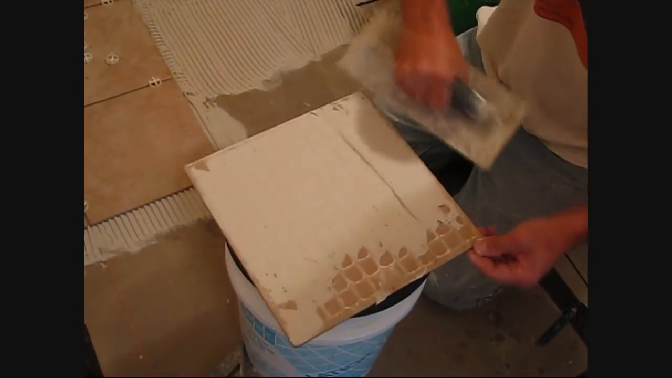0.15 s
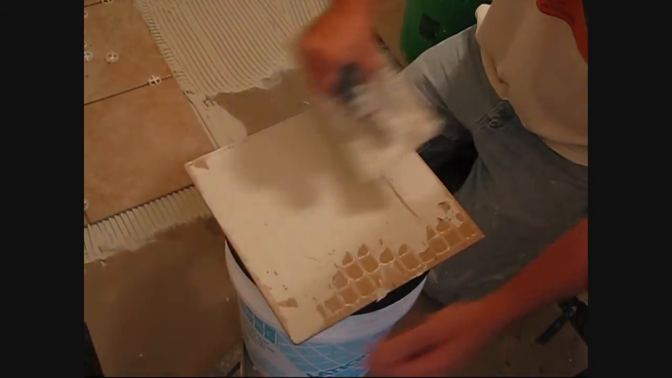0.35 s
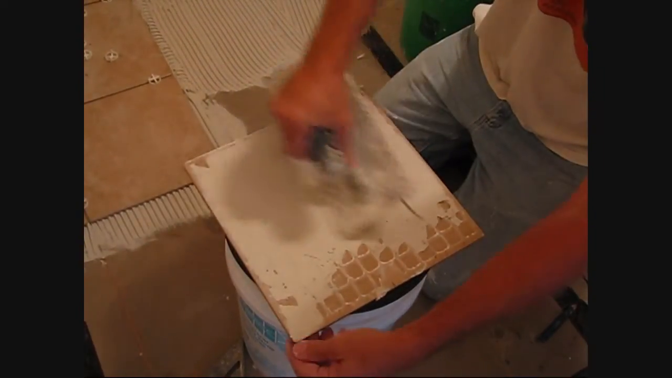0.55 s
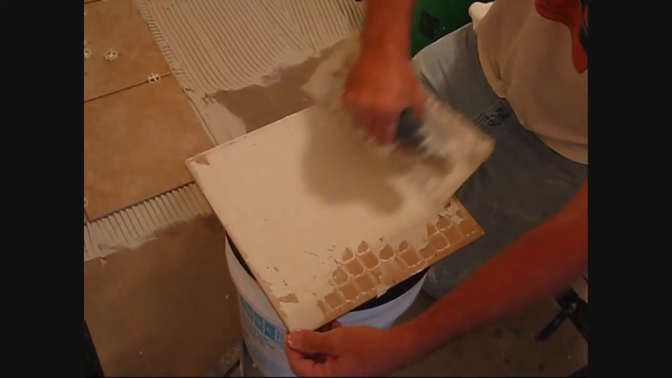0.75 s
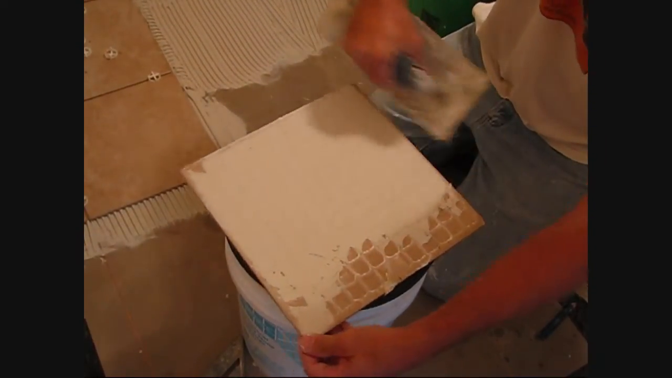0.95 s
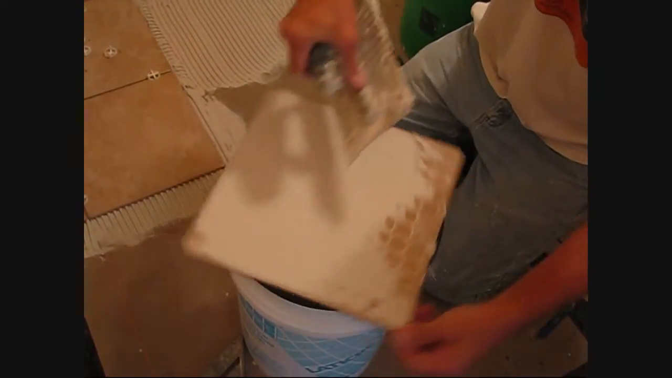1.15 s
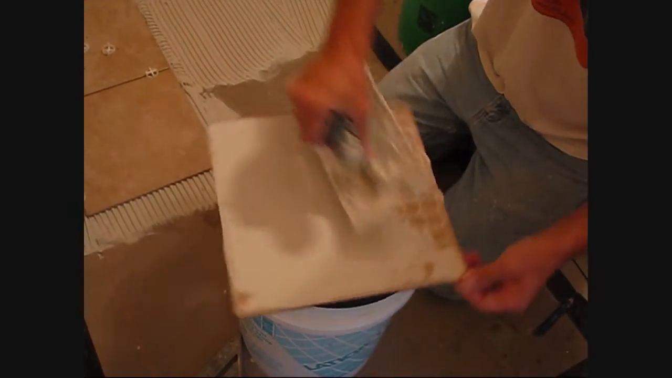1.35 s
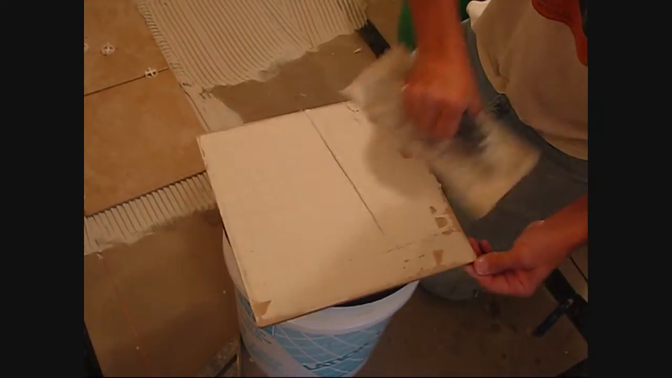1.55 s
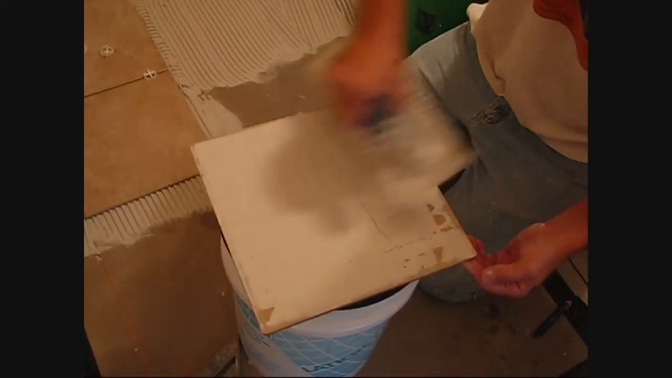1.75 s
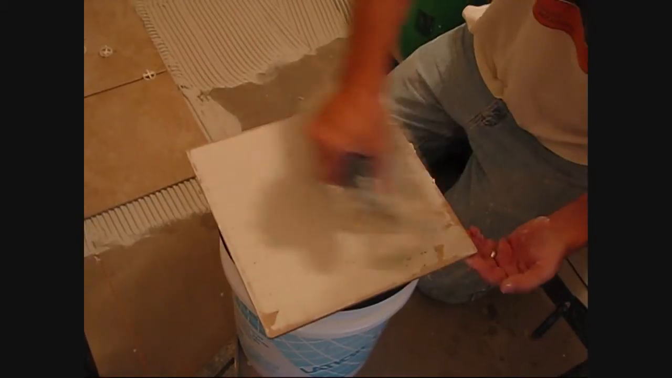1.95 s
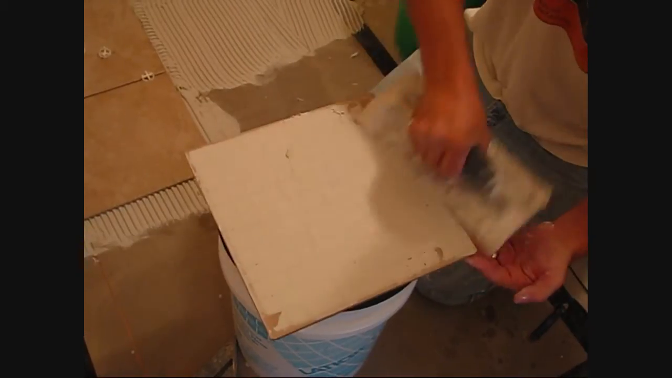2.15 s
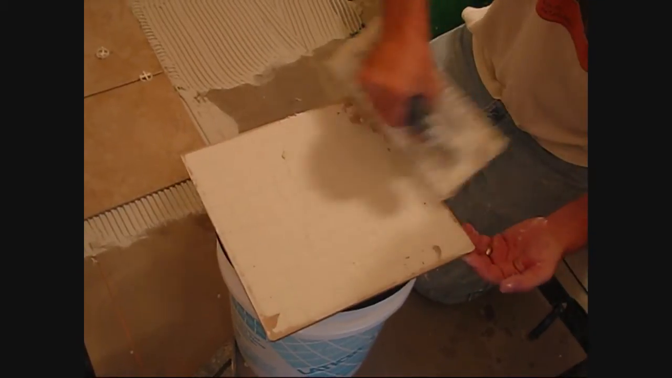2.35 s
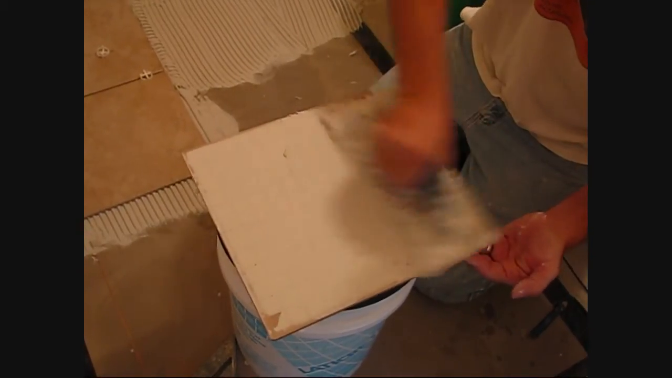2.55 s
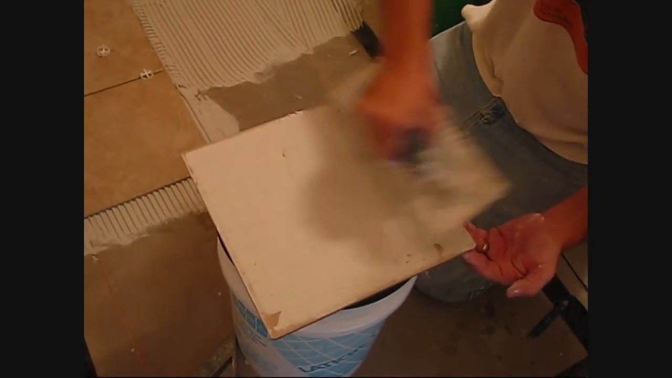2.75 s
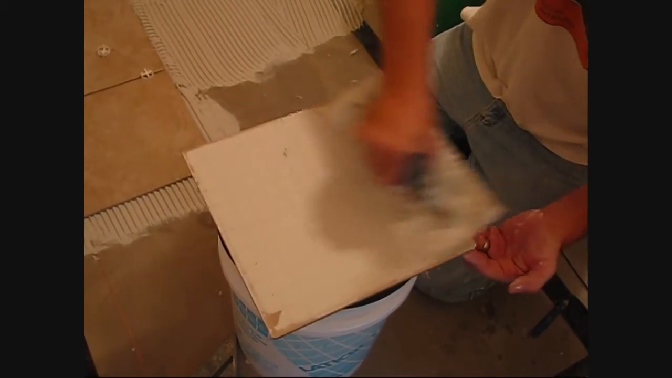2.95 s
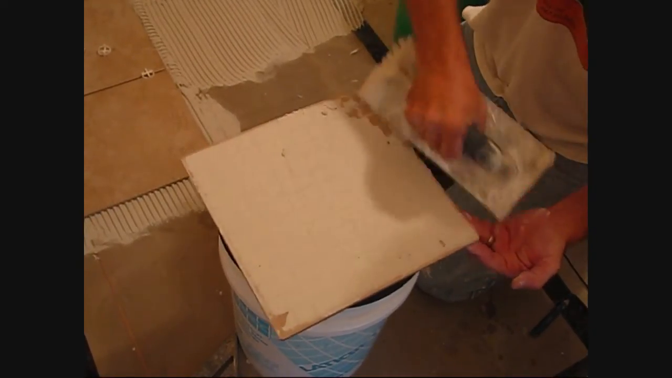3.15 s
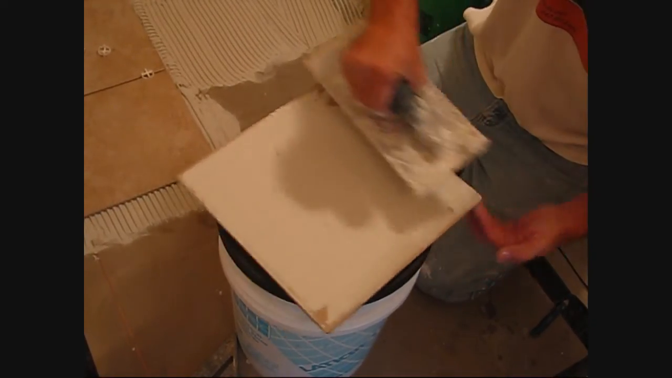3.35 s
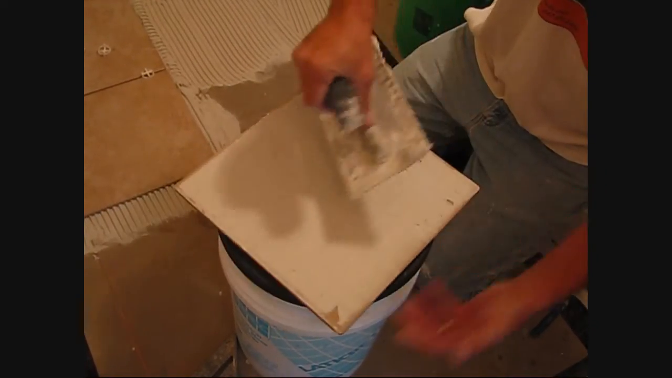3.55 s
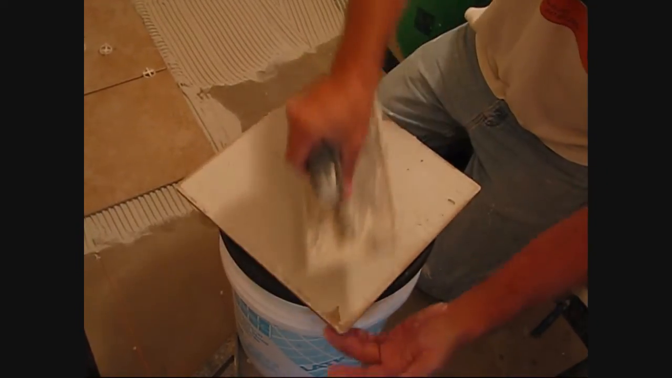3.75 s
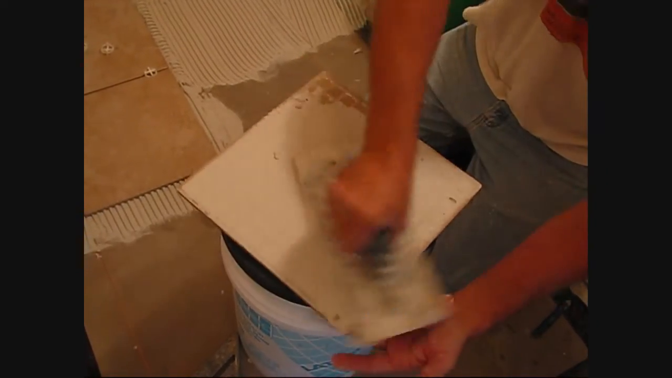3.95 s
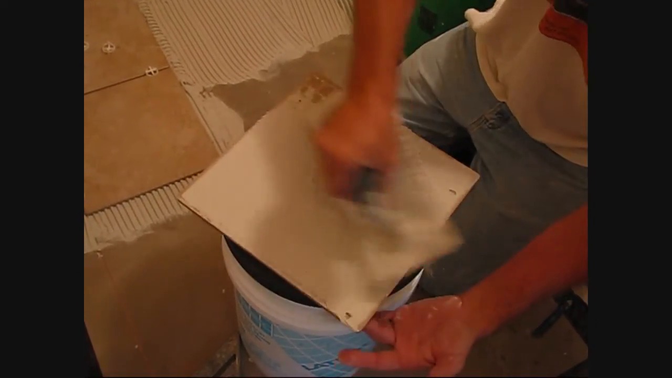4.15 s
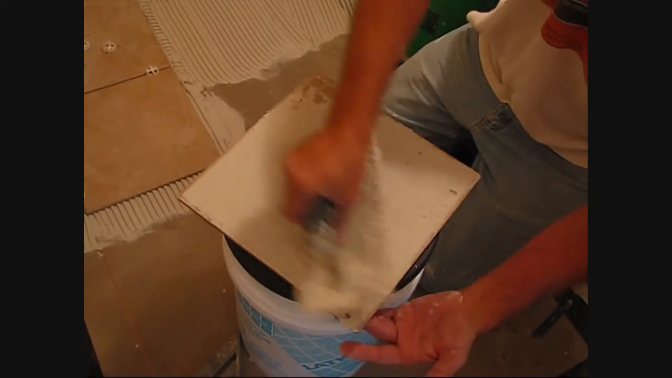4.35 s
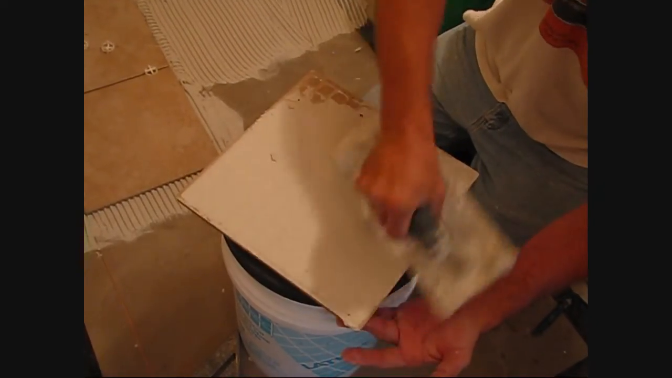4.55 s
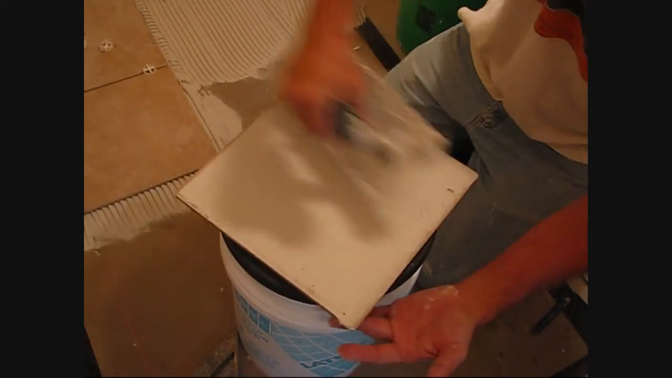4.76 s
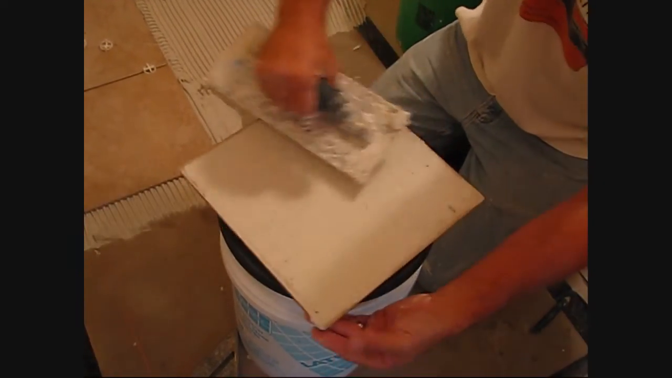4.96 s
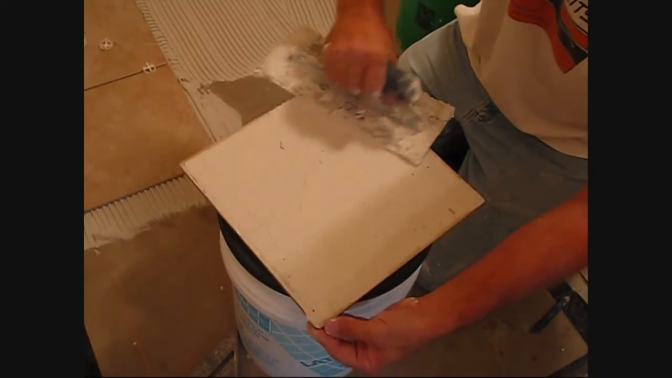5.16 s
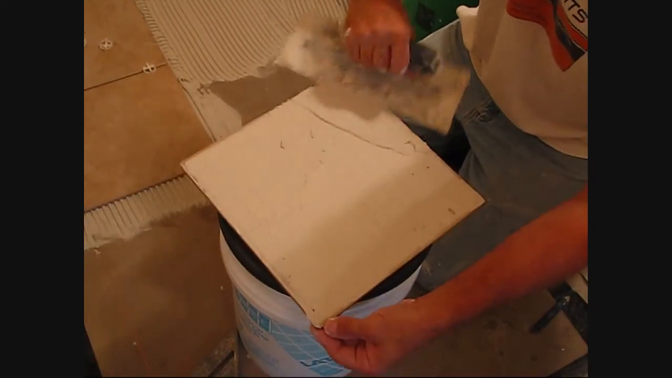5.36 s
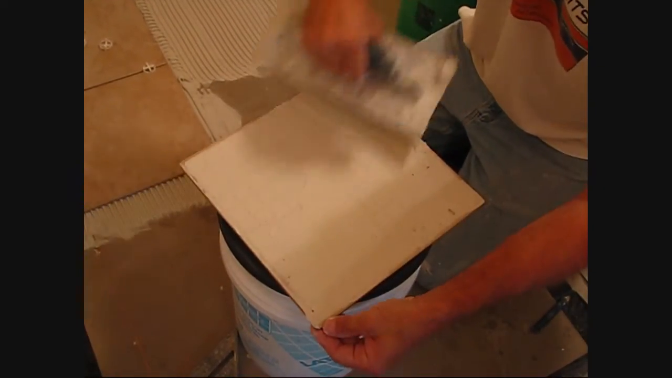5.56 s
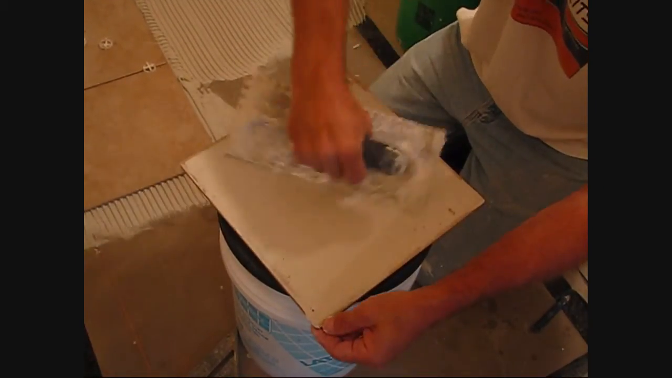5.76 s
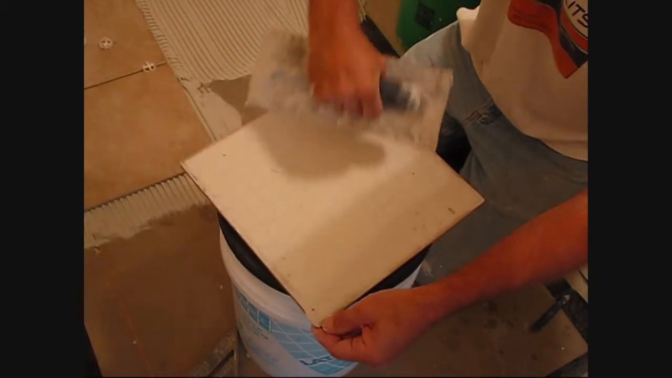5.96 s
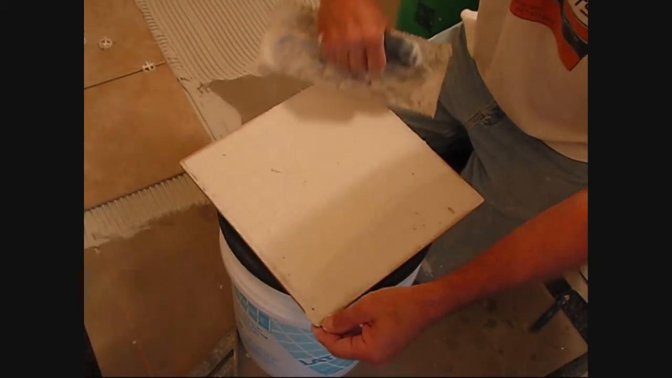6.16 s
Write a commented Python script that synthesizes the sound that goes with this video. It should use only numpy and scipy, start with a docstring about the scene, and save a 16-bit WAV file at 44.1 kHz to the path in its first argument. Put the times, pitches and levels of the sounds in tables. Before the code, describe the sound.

Sandy scrapes of a trowel spreading mortar on a tile, mixed with sharp ticks and soft thumps from the plastic bucket underneath.

```python
"""A steel trowel spreads and scrapes mortar over the back of a tile that lies on a plastic bucket.
Sand grains crushed under the blade ring the tile and hiss at the steel edge; each landing thumps the
bucket. Between strokes the tile is turned on the rim. The place is a bare room, heard through the
stereo microphone of a small camera about a metre above the work."""
import sys
import numpy as np
from scipy import signal
from scipy.fft import rfft, irfft, next_fast_len
from scipy.io import wavfile
from scipy.ndimage import uniform_filter1d

SR = 44100
rng = np.random.default_rng(int(sys.argv[2]) if len(sys.argv) > 2 else 0)


def generate_wav(signal):
    """Clip the signal to [-1, 1] and save it as 16-bit WAV at the path in sys.argv[1]."""
    frames = np.transpose(np.atleast_2d(signal))
    scaled = np.clip(frames, -1, 1) * 32767
    pcm = np.round(scaled).astype(np.int16)
    wavfile.write(sys.argv[1], SR, pcm)


N = 277375
TIME = np.arange(N) / SR
BITE_S, LIFT_S = 0.005, 0.026  # the blade bites into the mortar, leaves the tile
HISS_HOLD_S, RASP_HOLD_S = 0.0087, 0.032  # the edge comes free first, the mortar drags a little longer

# diffuse sound at the microphone's two ports: (frequency [Hz], side minus mid [dB])
STEREO_WIDTH = [(60, -25), (130, -25.5), (250, -17.5), (500, -10.5), (1000, -11), (2000, -3.5), (4000, 0.5),
                (8000, 1), (14000, 2)]
# the tile is pushed onto the bucket, and at 4.410 s the blade digs into the mortar: (time [s], thump [dB],
# thump tilt [dB/octave], rocking time [s], gritty clack [dB])
PUSHES = [(0.023, -20, 7.5, 0.027, -22.5), (0.597, -28, 1, 0.035, -25), (1.464, -30, -3, 0.07, -30),
          (1.906, -27.5, 5, 0.021, -37), (2.599, -32.5, 9, 0.04, -20), (2.945, -29, 3, 0.017, -25),
          (3.391, -32, 3, 0.068, -33.5), (3.969, -20, 0.5, 0.027, -22.5), (4.340, -41, -3, .05, -30),
          (4.410, -53, -1, .02, -13.5), (4.793, -40, -10.5, .04, -56.5), (5.153, -44, -5, 0.043, -54.5),
          (5.326, -47, 2, .03, -47), (5.835, -32, 6.5, 0.036, -13.5)]
# rasp of sand on the tile: (frequency [Hz], relative level [dB])
RASP_SPECTRUM = [(40, -30), (130, -29), (250, -18), (400, -9), (600, -6), (850, -0.5), (1150, 0),
                 (1600, 0.5), (2600, -1.5), (3400, -8), (5000, -10), (8000, -21), (16000, -23.5)]
# hiss of the steel edge: (frequency [Hz], relative level [dB])
EDGE_SPECTRUM = [(300, -12), (900, -10), (2000, -5.5), (2850, 1), (3500, -1.5), (5000, 0), (6300, -3.5),
                 (7300, -0.5), (9000, -4), (12000, -4), (16000, -10.5)]
# the blade lands, is pressed down, eases as the arm draws back and runs off the tile's edge:
# (time [s], pressed after [s], runs off after [s], landing [dB], pressed rasp [dB], easing [dB/s],
#  edge hiss [dB], run-off rasp [dB], run-off hiss [dB], run-off swell [s],
#  low ring [Hz], its level [dB], high ring [Hz], its level [dB], rasp tilt [dB/octave])
LONG_STROKES = [ (0.59, 0.037, 0.29, -14.5, -15, 50, -28, -18, -20, 0.032, 918, -4, 1340, -2.5, 1),
                (1.905, .042, 0.34, -20.5, -12, 83, -27.5, -23.5, -23.5, 0.037, 720, 5, 1550, -2, 1),
                (2.92, 0.029, 0.24, -23, -14, 78, -26.5, -22, -24, 0.037, 745, -1.5, 1737, -13, 1),
                (4.34, 0.04, 0.22, -31.5, -17, 31.5, -23, -23, -24.5, 0.045, 1008, 8, 1770, -6.5, 1.5),
                (5.828, 0.067, .41, -17.5, -13.5, 62, -27, -25, -19, 0.11, 1012, 5, 2085, -1, .5), ]


def undb(db):
    """Decibels to gain."""
    return 10 ** (np.asarray(db) / 20)


def unit(x):
    """Scale to rms 1."""
    return x / np.sqrt(np.mean(x ** 2))


def at(points, hz):
    """Read a table of (frequency [Hz], value) on a log-frequency axis."""
    frequencies, values = np.transpose(points)
    return np.interp(np.log(hz + 1), np.log(frequencies), values)


def colour(x, spectrum, size=4096):
    """Pass x through a minimum-phase filter of unit energy with the given spectrum."""
    gains = undb(at(spectrum, np.arange(size // 2 + 1) * SR / size))
    cepstrum = irfft(np.log(gains))
    cepstrum[1:size // 2] *= 2
    cepstrum[size // 2 + 1:] = 0
    response = irfft(np.exp(rfft(cepstrum)))
    return signal.fftconvolve(x, response / np.linalg.norm(response))[:len(x)]


def weigh(x, points):
    """Equalise x by a table of (frequency [Hz], gain [dB])."""
    size = next_fast_len(len(x) + 4096)
    gains = undb(at(points, np.arange(size // 2 + 1) * SR / size))
    return irfft(rfft(x, size) * gains, size)[:len(x)]


def resonate(x, hz, width_hz):
    """One resonance, gain 1 at its centre."""
    return signal.lfilter(*signal.iirpeak(hz, hz / width_hz, fs=SR), x)


def drift(rate_hz):
    """Smooth random drift of rms 1."""
    step = max(int(SR / rate_hz), 2)
    stairs = np.repeat(rng.standard_normal(N // step + 1), step)[:N]
    return unit(uniform_filter1d(stairs, step))


def add(track, start_s, sound):
    """Mix a sound into a track at start_s."""
    i = max(int(start_s * SR), 0)
    track[i:i + len(sound)] += sound[:N - i]


def gate(t, rise_s, length_s, fade_s):
    """Rise from t = 0, hold until length_s, then fade."""
    return np.clip(t / rise_s, 0, 1) * np.exp(-np.maximum(t - length_s, 0) / fade_s)


def room_tone(level_db=-60, whine_hz=8000, whine_db=-80.5):
    """The quiet room's low rumble, the camera's hiss and a thin electrical whine."""
    # rumble and hiss: (frequency [Hz], relative level [dB])
    spectrum = [(25, 4.5), (65, -1), (100, -18), (140, -4), (250, -15), (600, -20), (1500, -22),
                (4000, -28.5), (16000, -37)]
    mid, side = (colour(rng.standard_normal(N), spectrum) for _ in range(2))
    side = weigh(side, STEREO_WIDTH)
    whine = unit(resonate(rng.standard_normal(N), whine_hz, width_hz=120))
    return undb(level_db) * np.array([mid + side, mid - side]) + undb(whine_db) * whine


def wall_responses(count, early_db=2, early_s=0.011, gap_s=0.0032):
    """Bare walls return strong first reflections, then a tail in which the treble dies first."""
    # the room's reverberation: (frequency [Hz], t60 [s])
    decay_times = [(100, 0.69), (250, 0.56), (550, 0.72), (1400, 0.71), (3000, 0.58), (5500, 0.53),
                   (9500, 0.44), (15000, 0.35)]
    hz, frame_s, noise = signal.stft(rng.standard_normal((count, SR)), SR, nperseg=256)
    decay = np.exp(-np.log(1000) * frame_s / at(decay_times, hz)[:, None])
    tails = signal.istft(noise * decay, SR)[1][:, :SR]
    t = TIME[:SR]
    arrival = np.clip(t / gap_s - 1, 0, 1)
    responses = tails * arrival * (1 + undb(early_db) * np.exp(-t / early_s))
    return responses / np.linalg.norm(responses, axis=1, keepdims=True)


def bare_room(x, direct_db=-4, wet_db=-4, scatter_hz=220, places=4):
    """Grains break at scattered places along the blade; each reaches the mic with its own echoes."""
    # direct sound from the blade at the microphone: (frequency [Hz], left minus right [dB])
    balance = [(250, 2.5), (600, -2.5), (2000, -3.5), (4000, 3.5), (12000, 1.5)]
    shares = np.array([drift(scatter_hz) for _ in range(places)])
    shares /= np.linalg.norm(shares, axis=0)
    size = next_fast_len(N + SR)
    sent = rfft(shares * x * undb(wet_db), size)
    echo_spectra = [np.sum(sent * rfft(wall_responses(places), size), axis=0) for _ in range(2)]
    mid, side = irfft(echo_spectra, size)[:, :N]
    side = weigh(side, STEREO_WIDTH)
    direct = [weigh(x, [(hz, sign * db / 2) for hz, db in balance]) for sign in (1, -1)]
    return undb(direct_db) * np.array(direct) + np.array([mid + side, mid - side])


def sand(per_s, spread_db):
    """Clicks of crushed grains: many small, a few large."""
    hits = rng.random(N) < per_s / SR
    sizes = undb(spread_db * np.minimum(rng.exponential(size=N), 5))
    return unit(hits * sizes * np.sign(rng.standard_normal(N)))


def rubbing(groan_hz=222, groan_width_hz=35):
    """A scrape fades; later the turned tile stutters over the gritty rim and the bucket's wall groans."""
    # a fading scrape at the start, then nudges of the tile: (time [s], length [s], rub [dB], groan [dB])
    rubs = [(0.01, 0.093, -35, -58), (1.082, 0.26, -48, -57.5), (2.03, 0.22, -62, -56.5),
            (2.7, 0.16, -45.5, -47), (3.377, 0.066, -48, -51.5), (5.204, 0.19, -62, -76.5),
            (5.93, .36, -52, -48)]
    # the rubbed rim: (frequency [Hz], relative level [dB])
    rim_spectrum = [(30, -14.5), (100, -2), (160, 4), (240, -8), (330, -4), (700, -5.5), (1500, -7),
                    (3000, -17), (8000, -20), (16000, -30)]
    rub, strain = np.zeros(N), np.zeros(N)
    for start_s, length_s, rub_db, groan_db in rubs:
        push = gate(TIME - start_s, rise_s=0.043, length_s=length_s, fade_s=0.09)
        rub += undb(rub_db) * push
        strain += undb(groan_db) * push
    slips = sand(per_s=2800, spread_db=1) * undb(2 * drift(rate_hz=30))
    groan = unit(resonate(resonate(slips, groan_hz, groan_width_hz), groan_hz, groan_width_hz))
    return colour(slips * rub, rim_spectrum) + groan * strain


def bucket_thumps(swell_s=0.02, boom_db=-1, flap_db=-6):
    """Soft mortar cushions each push, so the bucket's boom swells before it fades; its wall flaps."""
    # the bucket under the tile: (frequency [Hz], level [dB], t60 [s])
    modes = [(31, -12.5, .3), (62.2, 0, 0.32), (72, -7.5, 0.1), (122.2, -1.5, 0.18), (135, -9.5, .18)]
    # the dull flap of its thin wall: (frequency [Hz], relative level [dB])
    flap_spectrum = [(30, -18.5), (45, -14.5), (65, -4.5), (100, -10.5), (140, -1.5), (210, -10.5),
                     (380, -6.5), (600, -16), (1500, -42.5), (16000, -75)]
    boom, flap, t = np.zeros(N), np.zeros(N), TIME[:SR // 2]
    swell = 1 - np.exp(-(t / swell_s) ** 2)
    for start_s, thump_db, tilt_db, rock_s, _ in PUSHES:
        for hz, mode_db, t60 in modes:
            detune = 1 + 0.032 * rng.standard_normal()  # the load on the rim differs each time
            ring = np.sin(2 * np.pi * hz * detune * t) * np.exp(-np.log(1000) * t / t60)
            gain = undb(boom_db + thump_db + mode_db + tilt_db * np.log2(hz / 90))
            add(boom, start_s, gain * swell * ring)
        add(flap, start_s, undb(thump_db + flap_db + tilt_db) * np.sqrt(swell) * np.exp(-t / rock_s))
    return boom + colour(flap * rng.standard_normal(N), flap_spectrum)


def tile_ringing(force, broadband_gain=0.87):
    """Tile and blade pass every frequency and ring at their modes."""
    # modes of tile and blade: (frequency [Hz], width [Hz], gain [dB])
    modes = [(579, 1.7, 4), (640, 3.4, 1.5), (712, 6.6, 3), (852, 39, -4.5), (919, 29, -6),
             (1288, 4.1, -6.5), (1456, 7.9, 1), (1640, 26, -4), (1775, 32, -5.5), (1910, 16, -6),
             (2530, 18, -3), (2700, 62, -5.5), (2930, 38, -12.5), (4480, 50, -10), (5380, 60, -12)]
    rings = sum(undb(db) * resonate(force, hz, width_hz) for hz, width_hz, db in modes)
    return broadband_gain * force + rings


def clacks(rise_s=0.0094, fade_s=0.025, tick_s=0.0006, knock_s=0.004, tick_gain_db=7, knock_gain_db=10):
    """Short crunches as the tile is pushed down, and single hard contacts that tick and knock."""
    # steel meets tile or a coarse grain bursts under it: (time [s], edge tick [dB], tile knock [dB])
    contacts = [(0.601, -8, -4), (0.658, -12, -0.5), (0.738, -3, -7), (0.805, -21, -25), (1.47, -34, -24),
                (1.552, -30, -23), (1.909, -23, -10), (2.919, -17.5, -21.5), (3.396, -22.5, -23),
                (3.969, -20.5, -27), (3.98, -27, -10.5), (4.344, -11, -25), (5.153, -49.5, -42),
                (5.373, -17, -26), (5.382, -31, -13), (5.445, -1.5, -10), (5.841, -17, 2)]
    pressure, ticks, knocks = np.zeros((3, N))
    t = TIME[:SR // 5]
    for start_s, *_, clack_db in PUSHES:
        add(pressure, start_s, undb(clack_db) * (1 - np.exp(-t / rise_s)) * np.exp(-t / fade_s))
    for start_s, tick_db, knock_db in contacts:
        tick = rng.standard_normal(len(t)) * np.exp(-t / tick_s)
        knock = rng.standard_normal(len(t)) * np.exp(-t / knock_s)
        add(ticks, start_s, undb(tick_db + tick_gain_db) * tick / np.linalg.norm(tick))
        add(knocks, start_s, undb(knock_db + knock_gain_db) * knock / np.linalg.norm(knock))
    crunch = pressure * sand(per_s=6800, spread_db=2)
    return colour(crunch + knocks, RASP_SPECTRUM) + colour(ticks, EDGE_SPECTRUM)


def run_off(t, swell_s, hold_s):
    """The scrape swells until the blade reaches the tile's edge at t = 0, holds a moment and lifts."""
    return np.exp(np.minimum(t, 0) / swell_s - np.maximum(t - hold_s, 0) / LIFT_S)


def blade_singing():
    """Grains flick the steel as it comes free at the end of a long stroke, and its high modes ring."""
    # modes of the free blade: (frequency [Hz], width [Hz], relative level [dB])
    modes = [(5330, 60, -14), (7050, 74, -12)]
    flick = np.zeros(N)
    for start_s, _, end_s, _, _, _, _, _, off_hiss_db, swell_s, *_ in LONG_STROKES:
        flick += undb(off_hiss_db) * run_off(TIME - start_s - end_s, swell_s, HISS_HOLD_S)
    grains = sand(per_s=4000, spread_db=2)
    return flick * sum(undb(db) * unit(resonate(grains, hz, width_hz)) for hz, width_hz, db in modes)


def wipe(t, end_s, drag_db, edge_db, off_db, off_hiss_db, swell_s=0.0083):
    """Rasp and hiss envelopes of a short stroke: a light drag, then the run-off."""
    contact = gate(t, BITE_S, end_s, LIFT_S)
    off_rasp = undb(off_db) * run_off(t - end_s, swell_s, RASP_HOLD_S)
    off_hiss = undb(off_hiss_db) * run_off(t - end_s, swell_s, HISS_HOLD_S)
    return np.hypot(contact * undb(drag_db), off_rasp), np.hypot(contact * undb(edge_db), off_hiss)


def spread(t, press_s, end_s, land_db, press_db, ease_db_per_s, edge_db, off_db, off_hiss_db, swell_s):
    """Rasp and hiss envelopes of a long stroke: landing, easing pressure, run-off."""
    land_ease_db_per_s, hiss_ease_db_per_s, land_hiss_db = 37.5, 28, -9
    pressed = np.clip((t - press_s) / 0.011, 0, 1)  # the blade takes the arm's weight in 11 ms
    landing = (1 - pressed) * undb(land_db - land_ease_db_per_s * t)
    rasp = landing + pressed * undb(press_db - ease_db_per_s * (t - press_s))
    hiss = landing * undb(land_hiss_db) + pressed * undb(edge_db - hiss_ease_db_per_s * (t - press_s))
    contact = gate(t, BITE_S, end_s, LIFT_S)
    off_rasp = undb(off_db) * run_off(t - end_s, swell_s, RASP_HOLD_S)
    off_hiss = undb(off_hiss_db) * run_off(t - end_s, swell_s, HISS_HOLD_S)
    return np.hypot(contact * rasp, off_rasp), np.hypot(contact * hiss, off_hiss)


def trowel_scraping(rasp_db=1, hiss_db=3, judder_db=2, judder_hz=170):
    """The blade sticks and slips over the sand; pressure rings the tile, the bare edge hisses."""
    # the blade drags lightly and is wiped off on the tile's edge:
    # (time [s], runs off after [s], drag rasp [dB], drag hiss [dB], run-off rasp [dB], run-off hiss [dB],
    #  low ring [Hz], its level [dB], high ring [Hz], its level [dB], rasp tilt [dB/octave])
    short_strokes = [ (0.102, 0.026, -31, -21.5, -22, -19.5, 644, 8.5, 1420, 1, 1.5),
                     (1.548, 0.038, -28, -35, -21.5, -14.5, 876, 5, 1700, -4, 0.5),
                     (2.604, 0.061, -30, -36.5, -23, -25, 940, 4.5, 1710, -1.5, 2.5),
                     (4.024, 0.038, -25, -26.5, -26, -19.5, 887, -2, 1630, -6, 2.5),
                     (5.383, 0.062, -29.5, -29, -26.5, -25, 861, 4.5, 2730, -2, 0.9), ]
    grip = unit(undb(judder_db * drift(judder_hz)))
    coarse, fine = sand(per_s=7000, spread_db=3), sand(per_s=14000, spread_db=3.5)
    edge_grains = unit(fine + 0.42 * coarse)  # coarse grains click at the edge too
    rasp, hiss = np.zeros(N), np.zeros(N)
    for gesture, strokes in (spread, LONG_STROKES), (wipe, short_strokes):
        for start_s, *motion, low_hz, low_db, high_hz, high_db, tilt_db in strokes:
            span = slice(int(start_s * SR), int((start_s + 0.7) * SR))
            pressure, edge = grip[span] * np.array(gesture(TIME[span] - start_s, *motion))
            tilt = [(1400 * 2 ** octave, tilt_db * octave) for octave in (-2, 2)]
            force = weigh(coarse[span] * pressure, tilt)
            # the line of contact leaves a different part of the blade free to ring in each stroke
            low_ring = undb(low_db) * resonate(force, low_hz, width_hz=20)
            high_ring = undb(high_db) * resonate(force, high_hz, width_hz=90)
            rasp[span] += force + low_ring + high_ring
            hiss[span] += edge_grains[span] * edge
    return undb(rasp_db) * colour(rasp, RASP_SPECTRUM) + undb(hiss_db) * colour(hiss, EDGE_SPECTRUM)


def scene(thump_room_db=-13):
    """Trowel, tile and bucket from a metre up; the thumps arrive mostly direct, alike at both ports."""
    thumps = bucket_thumps()
    thump_echoes = undb(thump_room_db) * signal.fftconvolve(thumps, wall_responses(count=1)[0])[:N]
    trowel_work = trowel_scraping() + blade_singing() + clacks() + rubbing()
    return tile_ringing(bare_room(trowel_work)) + thumps + thump_echoes + room_tone()


def record(dry, ceiling=0.9, top_hz=16100):
    """The camera rounds the highest peaks and cuts the top of the treble."""
    rounded = ceiling * np.tanh(dry / ceiling)
    return signal.sosfilt(signal.ellip(10, 0.2, 80, top_hz, fs=SR, output="sos"), rounded)


dry = scene()
out = record(dry)
generate_wav(out)
```